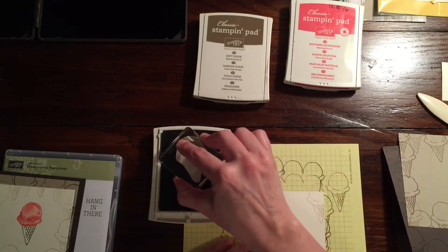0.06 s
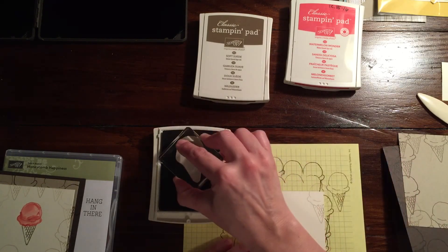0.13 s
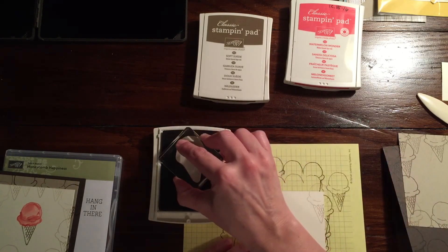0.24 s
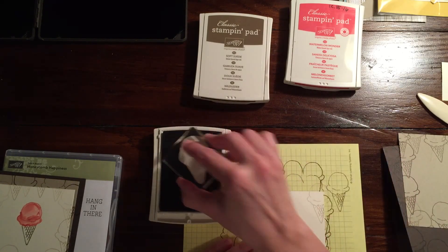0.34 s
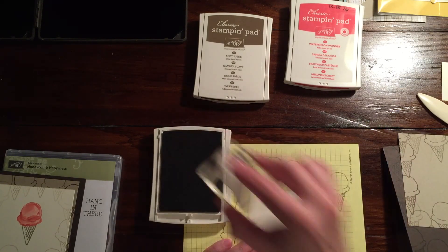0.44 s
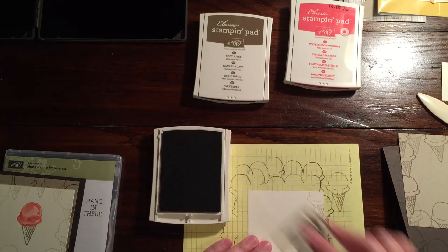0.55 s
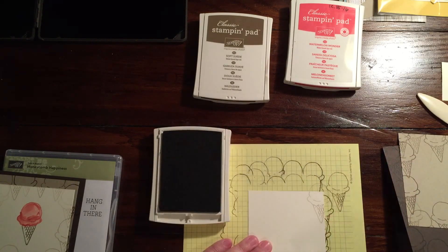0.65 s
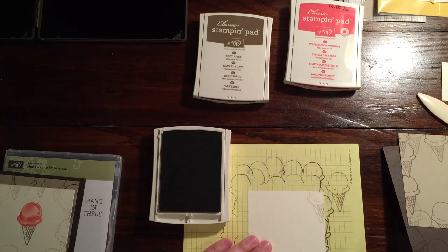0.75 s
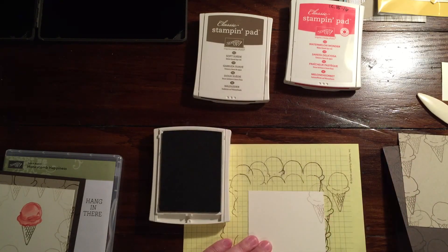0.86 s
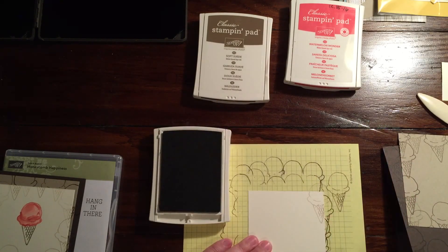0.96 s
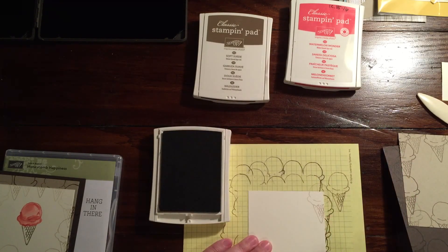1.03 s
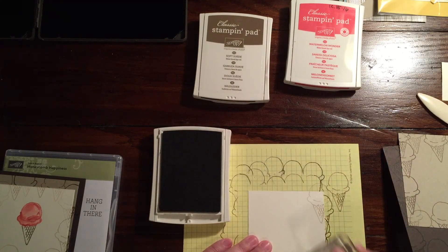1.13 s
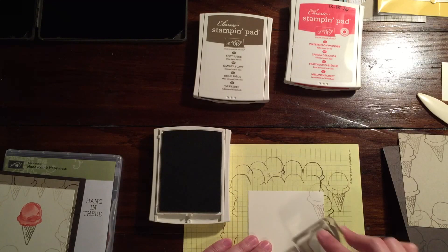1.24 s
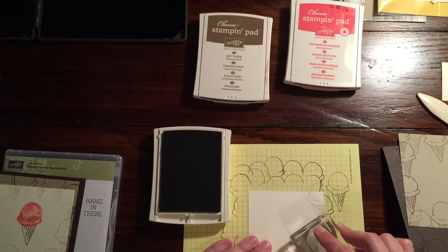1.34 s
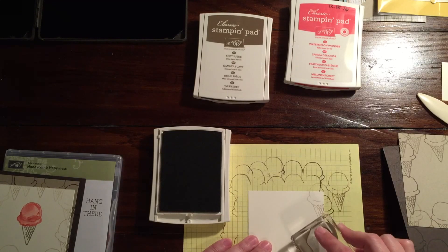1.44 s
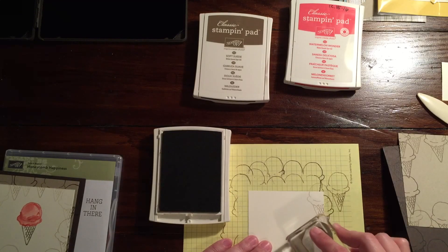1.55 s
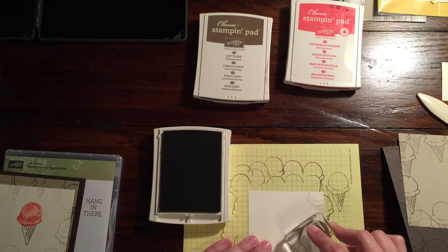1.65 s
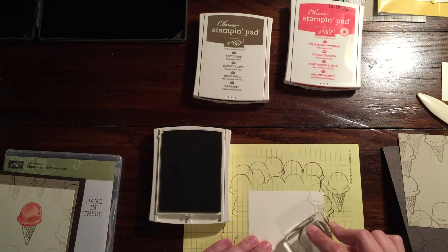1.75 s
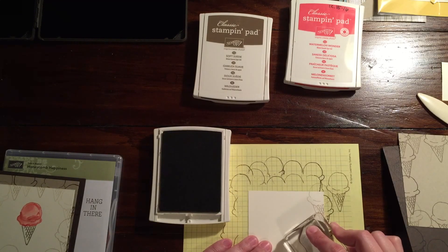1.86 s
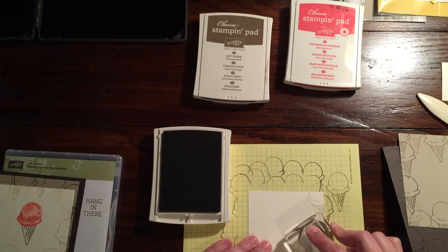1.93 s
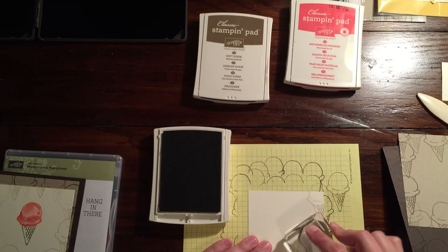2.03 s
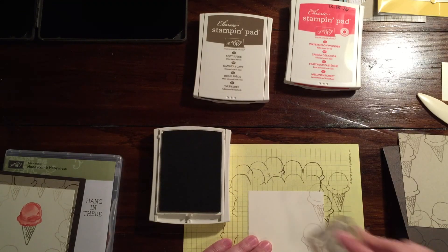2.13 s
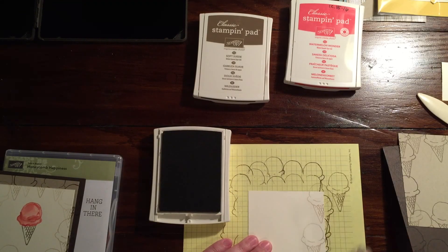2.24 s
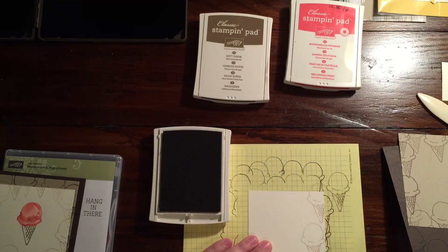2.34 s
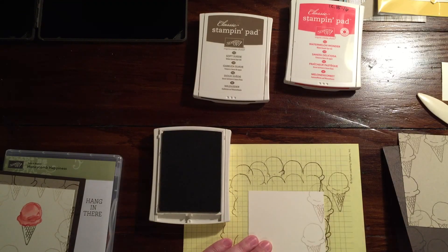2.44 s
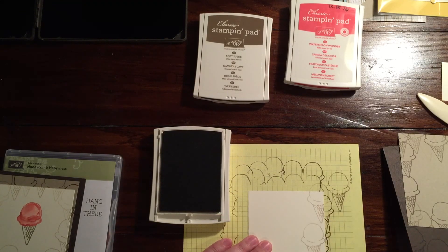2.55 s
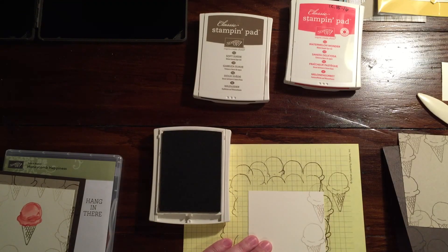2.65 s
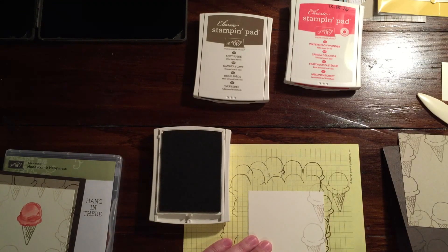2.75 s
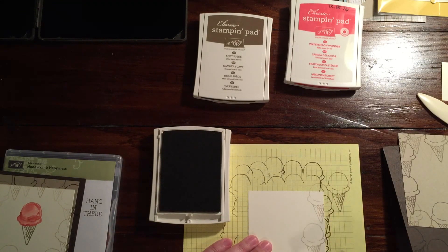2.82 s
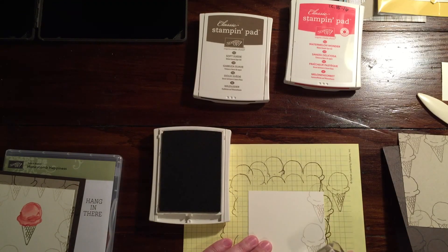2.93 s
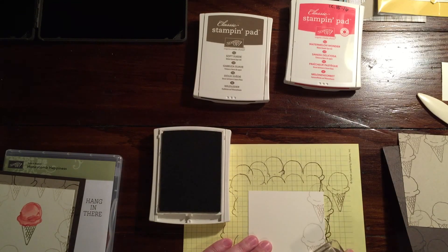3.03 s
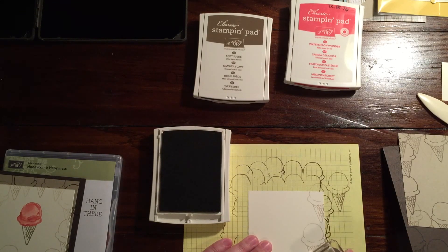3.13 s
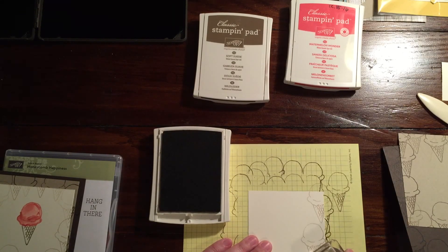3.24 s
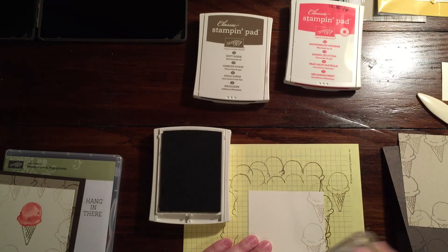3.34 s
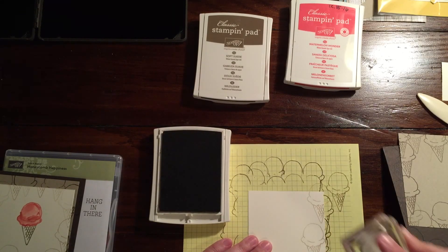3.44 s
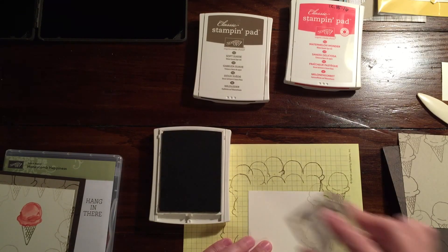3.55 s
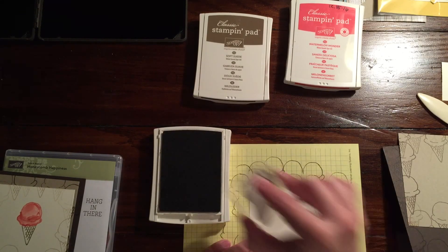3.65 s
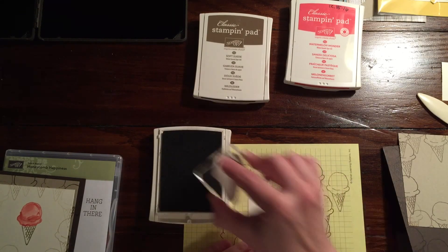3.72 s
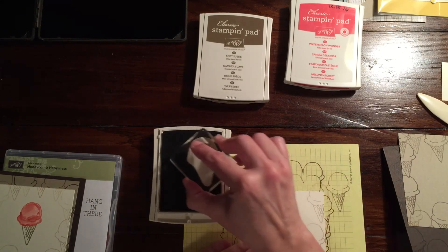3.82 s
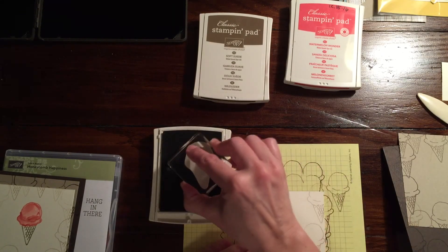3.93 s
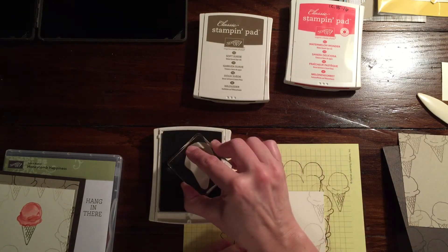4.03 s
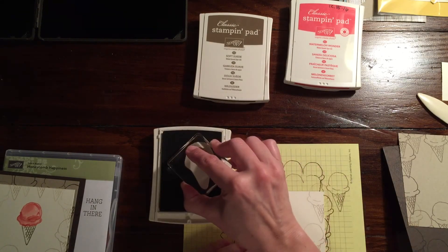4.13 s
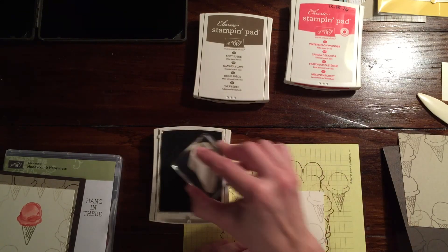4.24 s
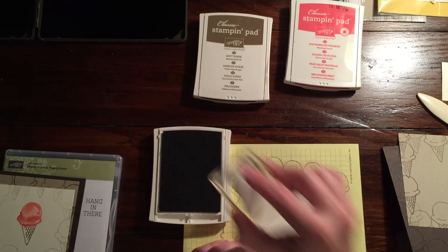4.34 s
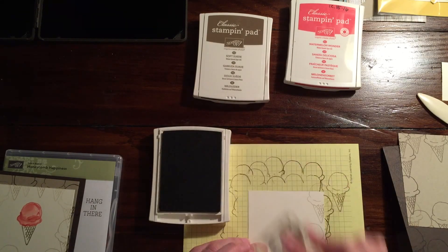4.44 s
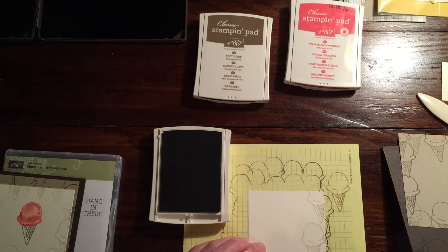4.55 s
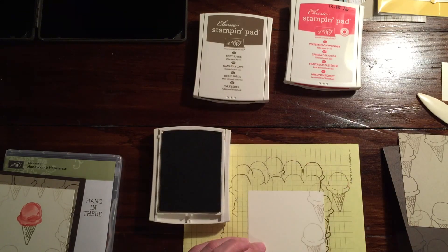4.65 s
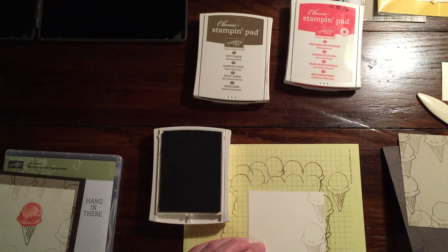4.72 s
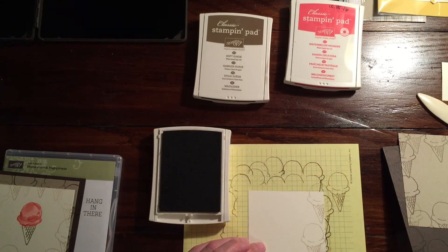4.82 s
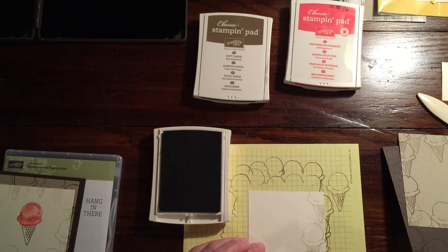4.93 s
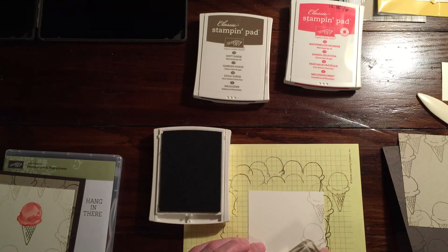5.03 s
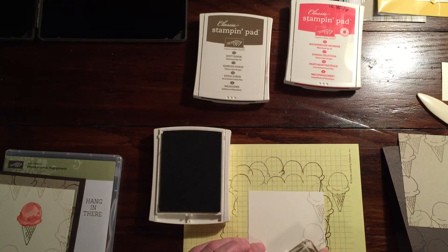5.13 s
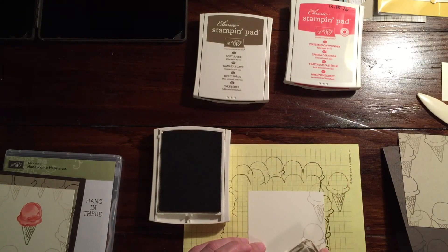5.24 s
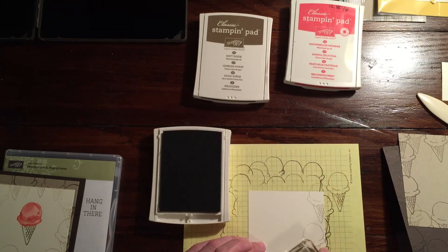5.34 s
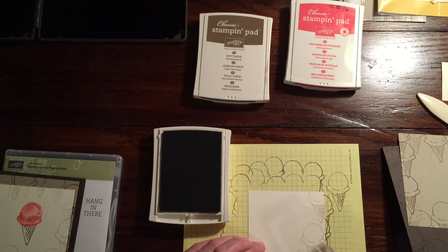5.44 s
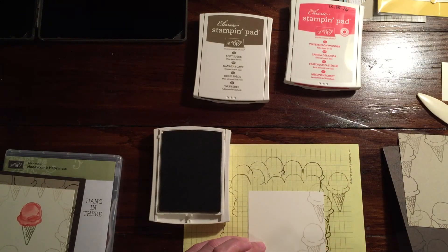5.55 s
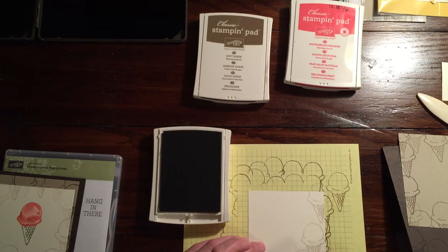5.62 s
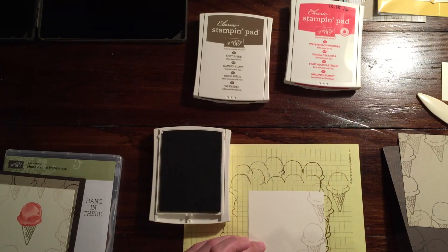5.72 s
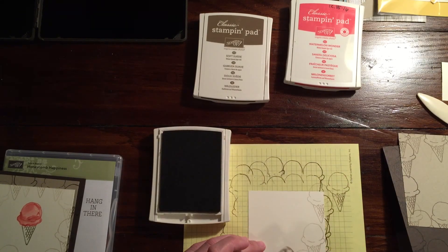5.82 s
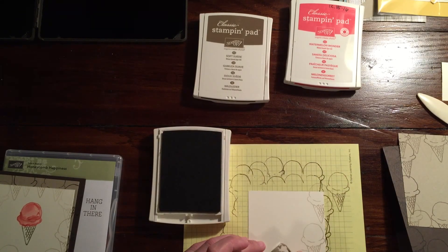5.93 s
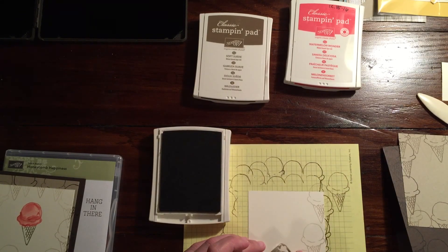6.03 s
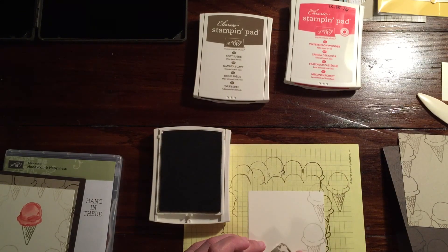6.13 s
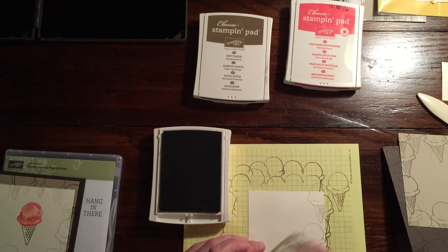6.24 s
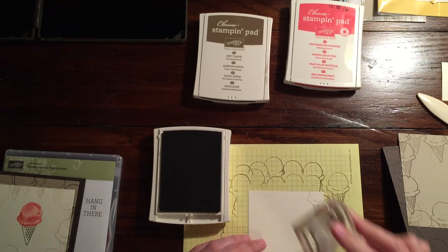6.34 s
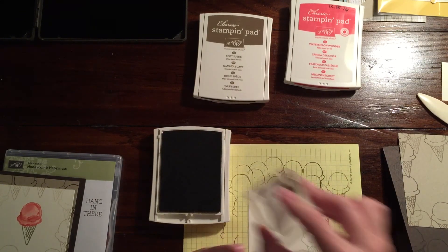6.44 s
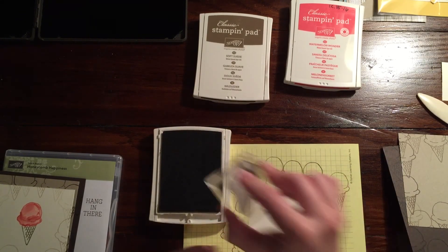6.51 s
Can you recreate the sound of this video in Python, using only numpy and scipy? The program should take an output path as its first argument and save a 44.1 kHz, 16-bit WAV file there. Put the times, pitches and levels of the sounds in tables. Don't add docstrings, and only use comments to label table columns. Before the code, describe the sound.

A close microphone catches unevenly spaced stamping on a wooden desk: a hollow plastic knock with a deep thud, a quick chattering rattle, then several dull presses on card with tiny rubbery crackles and peeling pops. Midway the stamp is inked again, knocking and rattling, followed by snappier presses and a loud lift. Room echo is short, over low hum and soft hiss, ending in abrupt silence.

```python
import sys
import numpy as np
from scipy import signal
from scipy.fft import rfft, irfft, next_fast_len
from scipy.io import wavfile

SR = 44100
rng = np.random.default_rng(int(sys.argv[2]) if len(sys.argv) > 2 else 0)


def volts_from_decibels(level):
    exponent = np.asarray(level, float) / 20
    return 10 ** exponent


def master(y):
    cut = np.clip(np.atleast_2d(y).T, -1, 1)
    pcm = np.round(cut * 32767)
    wavfile.write(sys.argv[1], SR, pcm.astype(np.int16))


N = 289983


def rms_one(x):
    return x / np.sqrt(np.mean(x ** 2) + 1e-20)


def ring(force, hz, t60):
    r, w = volts_from_decibels(-60 / (t60 * SR)), 2 * np.pi * hz / SR
    return signal.lfilter([0, np.sin(w)], [1, -2 * r * np.cos(w), r * r], force + 1e-18)


def band(x, hz, octaves):
    edges = [hz * 2 ** (-octaves / 2), min(hz * 2 ** (octaves / 2), SR / 2.2)]
    return signal.sosfilt(signal.butter(2, edges, "band", fs=SR, output="sos"), x)


def add(track, s, piece):
    at = round(s * SR)
    track[at:at + len(piece)] += piece[:N - at]


def crackle(bursts):
    out, t_ms = np.zeros(N), np.arange(8192) / SR * 1000
    for s, db, hz, octaves, length_ms in bursts:
        unevenness = volts_from_decibels(2.8 * np.minimum(rng.exponential(size=8192), 4))
        grains = rng.standard_normal(8192) * unevenness
        grains = ring(grains, hz, 2.5 / hz)
        swell = np.sqrt(t_ms / length_ms) * np.exp(-(1.58 * t_ms / length_ms) ** 1.24) * 2.2
        burst = band(grains * swell, hz, octaves)
        loudness = np.sqrt(np.sum(burst ** 2) / (length_ms * SR / 1000))
        add(out, s - .0005, volts_from_decibels(db - 3.5) * burst / loudness)
    return out


# frequency in Hz, level in dB per Hz.
AIR_COLOUR = [(82, -24), (140, 0), (370, -4.5), (801, -9.5), (1240, -10.5), (1510, -11.5), (1640, -10.5),
              (6560, -16), (7680, -18), (8830, -17.5), (16000, -22)]
# centre in Hz, width in Hz, rms level in dB.
HUM_BANDS = [(48.3, 18, -80.5), (59.8, 5.4, -78.5), (71.5, 14, -80.5), (120.4, 9, -78), (104, 20, -80.5)]


def air():
    size = next_fast_len(N)
    hz = np.arange(1, size // 2 + 2) * SR / size
    table = np.array(AIR_COLOUR)
    colour = volts_from_decibels(np.interp(np.log(hz), np.log(table[:, 0]), table[:, 1]))
    out = volts_from_decibels(-70.5) * rms_one(irfft(rfft(rng.standard_normal(size)) * colour, size))
    for centre_hz, width, db in HUM_BANDS:
        peak = 1 / (1 + (2 * (hz - centre_hz) / width) ** 2)
        out += volts_from_decibels(db) * rms_one(irfft(rfft(rng.standard_normal(size)) * peak, size))
    return out[:N]


# pitch in Hz, level in dB, t60 in seconds.
CASE_MODES = [(359, -9, 0.031), (480, -13.5, 0.027), (655, -13.5, 0.024), (793, -23, 0.017),
              (986, -3.5, 0.03), (1113, -5.5, 0.025), (1275, -7.5, 0.021), (1740, -0.3, 0.013),
              (1887, 2, 0.015), (2030, -9, 0.013), (2350, -5.5, 0.014), (3200, -5, 0.014),
              (3400, -19, 0.0087), (4450, -11, .006), (5760, -31, 0.0054)]


def strike_case(knocks):
    s, peak_db, hard_hz, deep_db = np.array(knocks).T
    chance_db = 3.4 * rng.standard_normal((len(s), len(CASE_MODES)))
    out = np.zeros(N)
    for k, (hz, db, t60) in enumerate(CASE_MODES):
        clicks = np.zeros(N)
        softness = 1 / (1 + (hz / hard_hz) ** 4) ** .5
        deepening_db = deep_db * (k < 4)
        clicks[(s * SR).astype(int)] = softness * volts_from_decibels(peak_db + db - 9 + deepening_db + chance_db[:, k])
        out += ring(clicks, hz, t60)
    out = signal.sosfilt(signal.butter(2, 720., "high", fs=SR, output="sos"), out)
    return signal.sosfilt(signal.butter(4, 4600., "low", fs=SR, output="sos"), out)


# start in seconds, peak in dB, hardness in Hz, extra level of the deep modes in dB.
CASE_KNOCKS = [(.1475, -43, 1200, .1), (.1505, -38, 2200, -11), (.1522, -22, 1440, -19),
               (.1535, -36, 1490, -6), (.452, -42, 1200, -5), (2.569, -38.5, 1500, 11),
               (3.11, -49, 1500, .1), (3.116, -37, 1100, 0.5), (4.0393, -33.5, 3500, -11),
               (4.0425, -27.5, 1420, 10.5), (4.045, -26.5, 1300, 12.5), (4.056, -38, 1500, 3.),
               (4.068, -41, 1150, -3.), (2.589, -49, 1500, 1), (4.313, -45, 2000, -4),
               (4.346, -42, 1200, -6)]


def pad_knocks():
    return strike_case(CASE_KNOCKS)


# time in seconds, force in dB, contact in ms, tilt toward upper modes in dB per octave.
DESK_BLOWS = [(.149, -20, 2.46, 0), (.8873, -25.5, 1.5, 1.9), (1.7549, -31, 5.1, -6),
              (2.5639, -22, 1.25, 1.5), (3.09, -24, 2.35, -3.5), (4.0403, -21, 3.4, -3.5),
              (4.755, -22, 2.5, -0.5), (5.1601, -22.5, 1.5, 0.5), (6.009, -31, 6, -3.5),
              (.412, -37.5, 1, 8.5), (.424, -39, 2.4, 5), (4.272, -37, 2.3, 7.5), (4.284, -42.5, 1.2, 6),
              (2.173, -51.5, 3.4, -3), (1.2, -62, 3.5, -1.), (1, -63.5, 1.3, 7.5), (5.4, -59.5, 1.5, 1),
              (5.4, -60, 3.5, 2.), (3.2, -60, 3., -3.), (6.3, -58.5, 2.5, -3), (2.81, -65.5, 2., -3),
              (.26, -49, 3.2, 1), (4.945, -54.5, 2.7, 2), (4.6, -60, 5., -9), (1.7, -63, 4., -4)]
# pitch in Hz, level in dB, t60 in
# seconds, direction of the first swing.
DESK_MODES = [(47, -20.5, 0.32, 1), (58.1, -27, 0.84, 1), (63.2, -23, .25, -1), (80.45, -13.5, 0.31, -1),
              (129.3, -1.2, 0.16, 1), (147.2, -9, 0.17, -1), (179.9, -5.5, 0.15, -1),
              (216.4, -9.5, 0.12, 1), (258.8, -17.5, 0.077, -1), (336, -19, .11, -1),
              (397.6, -21, 0.084, -1), (558, -26, 0.074, 1)]


def desk_thuds():
    out = np.zeros(N)
    for hz, db, t60, way in DESK_MODES:
        force = np.zeros(N)
        for s, force_db, contact_ms, tilt_db in DESK_BLOWS:
            push = np.hanning(round(contact_ms * SR / 1000) + 2)
            push_db = force_db + tilt_db * np.log2(hz / 131)
            add(force, s - contact_ms / 2000, volts_from_decibels(push_db) * push / push.sum())
        out += np.sign(way) * volts_from_decibels(db) * ring(force, hz, t60)
    return signal.lfilter(*signal.butter(1, 52.7, "high", fs=SR), out)


BODY_LAG_S = 0.00247


def snap(s, broad_db, ring_db, ring_hz, shape):
    return [(s, broad_db, *shape),
            (s, ring_db, ring_hz, .65, 3.8),
            (s, broad_db - 11.5, 11000, 0.98, 3.2),
            (s + BODY_LAG_S, broad_db - 13, 2450, 2.8, 12.4)]


# time in seconds, broad snap in dB, ringing snap in dB, its pitch in Hz, squash in dB.
RUBBER_LANDINGS = [
    (.15, -50.5, -52, 6000, -54.5),
    (.8865, -56.5, -70, 2950, -58),
    (1.754, -52, -53, 3200, -61.5),
    (2.563, -55, -49.5, 2760, -46.5),
    (3.088, -57, -54, 5300, -63),
    (4.039, -52.5, -66, 4000, -44.5),
    (4.7537, -44, -63, 10000, -58),
    (5.1591, -46, -41.5, 6700, -53.5),
    (6.006, -62, -70, 2800, -73),
]


def landings():
    bursts, jolts = [], []
    for s, broad_db, ring_db, ring_hz, squash_db in RUBBER_LANDINGS:
        bursts += snap(s, broad_db, ring_db, ring_hz, (3620, 1.8, 4.0))
        bursts.append((s + BODY_LAG_S, squash_db, 730, 2.16, 16.2))
        jolts.append((s + 0.00186, squash_db + 12, 1000, 5.5))
    return crackle(bursts) + strike_case(jolts)


# band centre in Hz, t60 in seconds, level in dB.
ROOM_BANDS = [(310, .2, -11.5), (940, 0.22, -19.5), (2630, 0.21, -18.5), (6000, 0.15, -17),
              (12000, .1, -23)]


def room(x):
    t = np.arange(SR // 2) / SR
    rise = np.clip(t / 0.002 - 1, 0, 1)
    echo = np.zeros(len(t))
    for hz, t60, db in ROOM_BANDS:
        tail = rng.standard_normal(len(t)) * rise * volts_from_decibels(-60 * t / t60)
        echo += volts_from_decibels(db) * band(tail, hz, 1.47) / 8
    return signal.fftconvolve(x, echo)[:N]


# start in seconds, rms level in dB, centre in Hz, length in ms.
SOFT_RUSTLES = [(.153, -44, 1140, 9.4), (1.748, -64, 1500, 8.2), (3.068, -67.5, 3000, 30),
                (3.55, -78, 12000, 97), (3.67, -75, 13000, 40.), (3.82, -70, 10100, 25.),
                (4.02, -70, 12000, 34), (4.24, -67.5, 9000, 29), (4.745, -62, 3000, 6.7),
                (4.765, -62, 800, 26), (2.572, -59, 1700, 19), (5.14, -68, 5000, 22),
                (6.008, -66, 2000, 13), (5.44, -72, 3000, 40.)]


def rustles():
    return crackle([(s, db, hz, 1.7, ms) for s, db, hz, ms in SOFT_RUSTLES])


# start in seconds, rms level in dB,
# centre in Hz, width in octaves.
SHORT_TICKS = [(2.81, -68, 3500, 1.1), (3.088, -48.5, 4170, .3), (3.088, -46, 2900, .22),
               (0.1532, -40, 1120, 0.37), (4.044, -39, 1020, 0.47), (3.088, -52, 1660, 0.23),
               (3.088, -54, 9300, 1.3), (3.587, -67, 8000, 2.1), (3.63, -63, 5600, 1),
               (3.661, -64, 12000, 1.2), (3.83, -60, 9600, .89), (4.924, -55, 9000, 2.3),
               (6.305, -65, 4000, 3.7), (6.448, -65, 4000, 2.1)]


def ticks():
    return crackle([(*tick, 4) for tick in SHORT_TICKS])


# start in seconds, peak in dB, gap between touches in ms, extra level of the deep modes in dB.
CASE_RATTLES = [
    (0.4114, -21.5, 2.7, -8),
    (4.2719, -22.5, 3.0, -6),
]
# level in dB re its peak, centre in Hz, width in octaves, length in ms.
RATTLE_CHATTER = [(-20.5, 3500, 1.1, 17), (-44, 6700, 1.1, 17), (-29, 5400, 0.8, 3.7)]


def rattles():
    touches, unstick_s = 9, .012
    hardness_hz = np.geomspace(4000, 1300, touches)
    knocks, bursts = [], []
    for s, db, gap_ms, deep_db in CASE_RATTLES:
        knocks.append((s - unstick_s, db - 16, 1000, 5.5))
        bursts.append((s - unstick_s - BODY_LAG_S, db - 31, 5000, 1.8, 4.0))
        late = np.cumsum(1 + .28 * rng.standard_normal(touches))
        for k in range(touches):
            touch_s = s + (late[k] - late[0]) * gap_ms / 1000
            knocks.append((touch_s, db - 0.32 * k, hardness_hz[k], deep_db + 0.84 * k))
        bursts += [(s, db + below_db, *shape) for below_db, *shape in RATTLE_CHATTER]
    return strike_case(knocks) + crackle(bursts)


# time in seconds, broad snap in dB, ringing snap in dB, its pitch in Hz, suction pop in dB.
RUBBER_LIFTS = [
    (1.1087, -50.5, -62, 9000, -49.5),
    (2.165, -57.5, -60, 8040, -59),
    (4.927, -44.5, -54, 11000, -48.5),
    (6.462, -58.5, -50.5, 6730, -71),
]


def lifts():
    bursts = []
    for s, broad_db, ring_db, ring_hz, pop_db in RUBBER_LIFTS:
        bursts.append((s - .013, broad_db - 19, 5000, 1.8, 18))
        bursts += snap(s, broad_db, ring_db, ring_hz, (4600, 2.55, 6.3))
        bursts.append((s + BODY_LAG_S, pop_db, 573, 2.3, 4.1))
    return crackle(bursts)


def scene():
    thud = desk_thuds()
    bright = pad_knocks() + landings() + rustles() + ticks() + rattles() + lifts()
    echo = volts_from_decibels(-2.0) * room(bright + 0.48 * thud)
    return (thud + bright + echo + air())[None]


def low_pass(x):
    return signal.sosfilt(signal.butter(12, 16300, fs=SR, output="sos"), x)


# centre in Hz, width in Hz, level in dB.
HOUSING_DIPS = [(5000, 540, -3), (7600, 490, -1.5), (10520, 750, -4.5), (14700, 700, -2.5), (15450, 400, 3)]


def record(dry):
    size = next_fast_len(N)
    hz = np.arange(size // 2 + 1) * SR / size
    dips_db = sum(db * np.exp(-((hz - dip_hz) / width) ** 2 * 2) for dip_hz, width, db in HOUSING_DIPS)
    top = np.clip((15780 - hz) / 60, .07, 1)
    bottom = 1 / np.sqrt(1 + (40.0 / (hz + 1)) ** 8)
    heard = irfft(rfft(dry, size) * volts_from_decibels(dips_db) * top * bottom, size)[:, :N]
    heard = heard * (np.arange(N) < 6.5745 * SR)
    return low_pass(heard)


dry = scene()
out = record(dry)
master(out)
```